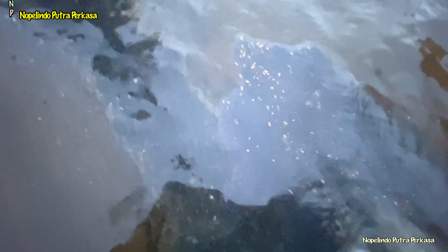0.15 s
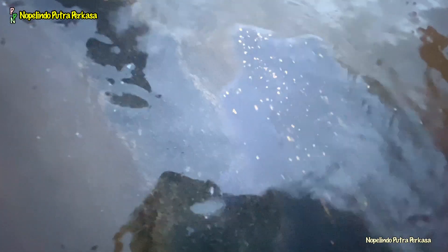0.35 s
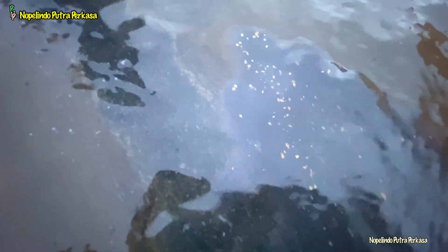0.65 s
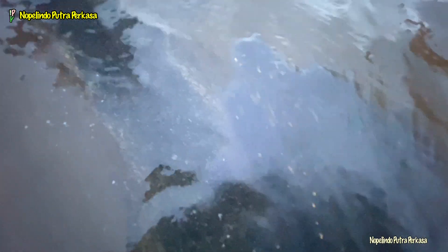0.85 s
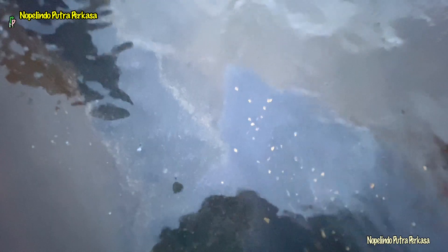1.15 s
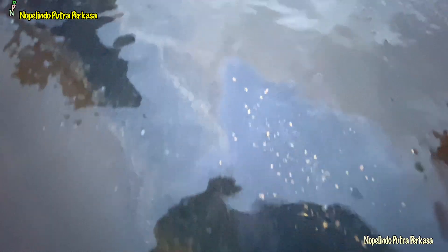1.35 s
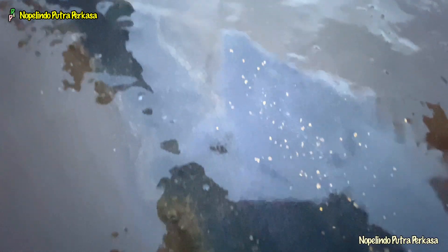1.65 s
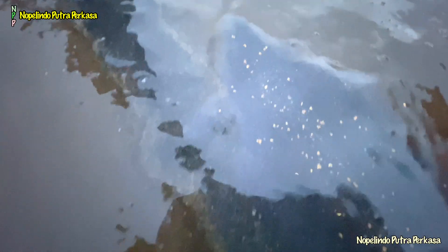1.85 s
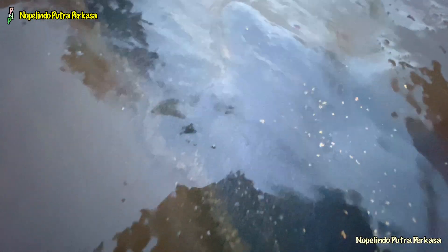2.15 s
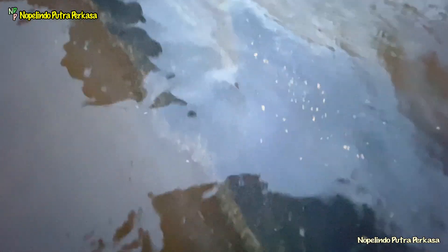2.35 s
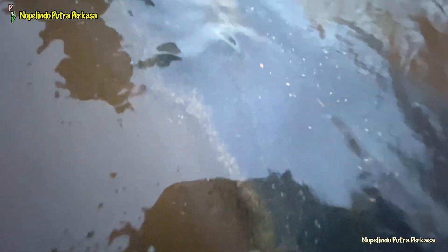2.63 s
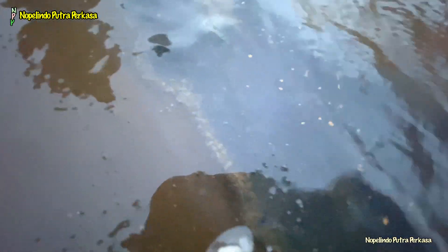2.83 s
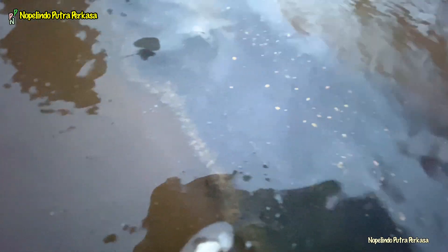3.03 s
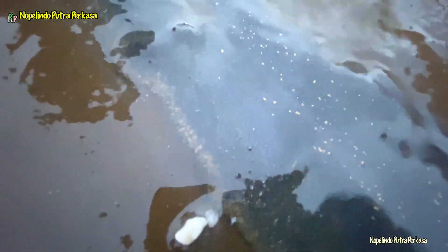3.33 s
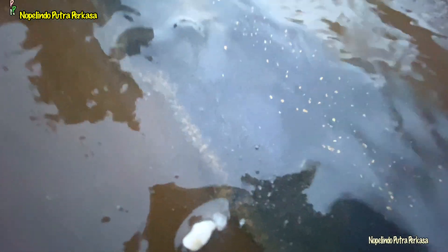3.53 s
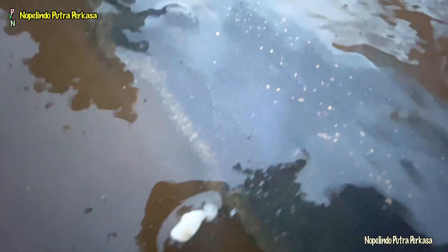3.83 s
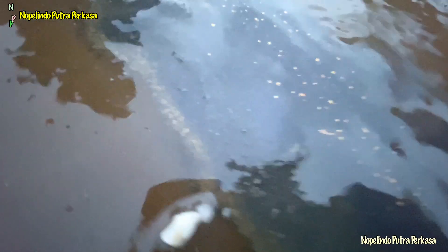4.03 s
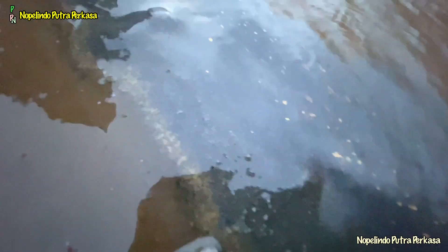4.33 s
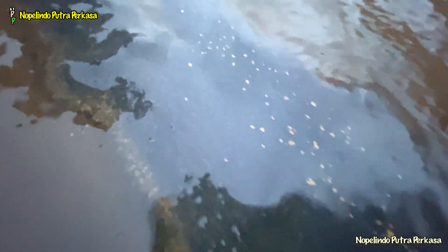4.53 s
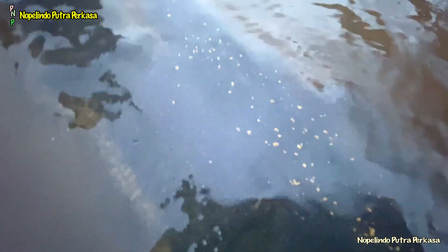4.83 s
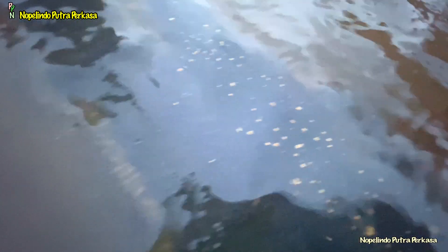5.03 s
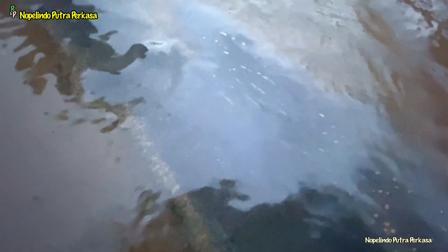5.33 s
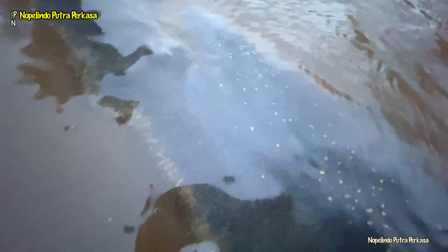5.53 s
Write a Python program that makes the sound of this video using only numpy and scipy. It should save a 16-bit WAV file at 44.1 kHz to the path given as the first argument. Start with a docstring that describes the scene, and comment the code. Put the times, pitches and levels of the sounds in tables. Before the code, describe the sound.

Very close outdoors, a wide pan of muddy water and gravel is swirled: soft gurgles, bubbly plops, gritty slaps and tiny bright drips over near silence. After about three seconds, hollow low thumps begin, growing into loud, regular knocks about five a second, each stirring up more water, ending shortly before the close. A faint rising whistle, like a distant bird, comes and goes.

```python
"""An open pit: a wide pan of muddy water and gravel is swirled close to the microphone.
Water laps and drips: crowds of ringing bubbles over hiss, gritty bursts for slaps, bright ticks for drops.
Then a run of knocks, mostly a fifth of a second apart, settles the gravel: damped pan modes make a hollow
thump, noise bands a thud and gritty noise a crack, and each knock stirs up more water.
A thin rising whistle, like a far bird, comes and goes over faint open air."""
import sys
import numpy as np
from scipy import signal
from scipy.fft import rfft, irfft, next_fast_len
from scipy.io import wavfile

SR = 44100
rng = np.random.default_rng(int(sys.argv[2]) if len(sys.argv) > 2 else 0)


def generate_wav(signal):
    """Clip the signal to [-1, 1] and save it as 16-bit WAV at the path in sys.argv[1]."""
    frames = np.transpose(np.atleast_2d(signal))
    scaled = np.clip(frames, -1, 1) * 32767
    pcm = np.round(scaled).astype(np.int16)
    wavfile.write(sys.argv[1], SR, pcm)


N = 250047
TIME = np.arange(N) / SR

# knocks on the pan: t/s, boom level/dB, ring level/dB, thud level/dB, crack level/dB, upper-mode pitch/ratio
KNOCK_TABLE = [(3.1508, -11.5, -29, -22, -40, 1.07), (3.3882, -3.5, -16, -16.5, -27.5, 0.91),
               (3.5753, -6.5, -21.5, -18.5, -33.5, 0.96), (3.7564, -6, -17, -18, -29, 0.85),
               (3.9530, 0, -7.5, -14.5, -25.5, 1.065), (4.1910, -1.5, -10.5, -13, -22.5, 1.03),
               (4.416, 1, -4.5, -8, -23.5, 1.015), (4.6540, -0.5, -12.5, -13, -22, 1.07),
               (4.9001, -3.5, -3, -10, -18.5, 0.94), (4.9648, -3, -6, -14.5, -16, 1.04),
               (5.1135, -23, -14.5, -14.5, -41, 0.95), (5.1548, 0, -7, -12.5, -15.5, 1.06),
               (5.361, -33, -38, -46, -45.5, 1.2), (5.4350, -21, -29, -23, -63, 1.02)]


def from_db(db):
    """Decibels to gain."""
    return 10 ** (np.asarray(db) / 20)


def rms_one(x):
    """Scale to rms 1."""
    return x / np.sqrt(np.mean(x ** 2) + 1e-20)


def add(track, s, sound):
    """Mix a sound into the track from time s on."""
    at = max(round(s * SR), 0)
    room = track[..., at:at + sound.shape[-1]]
    room += sound[..., :room.shape[-1]]


def coloured(x, points):
    """Filter by a spectrum of (Hz, dB) points, joined by lines over log frequency."""
    size = next_fast_len(N + 4096)
    hz, db = np.transpose(points)
    bins_hz = np.arange(size // 2 + 1) * SR / size
    gain = from_db(np.interp(np.log(bins_hz + 1), np.log(hz), db))
    return irfft(rfft(x, size) * gain, size)[..., :N]


def at_ports(x, lead):
    """Place one source at both microphone ports, the left ahead in phase by lead radians."""
    analytic = signal.hilbert(x, next_fast_len(N))[:N]
    left = np.real(analytic * np.exp(1j * lead))
    return np.array([left, x])


def drift(hz):
    """Random wandering with rms 1: noise low-passed at hz."""
    low_pass = signal.butter(2, hz, fs=SR, output="sos")
    slow = signal.sosfilt(low_pass, rng.standard_normal(N + SR // 2))
    return rms_one(slow[-N:])  # leaves out the filter's start


def open_air(level_db=-68.5):
    """Still open air: a steady, low-weighted noise, independent at the two ports."""
    # spectrum of the air: f/Hz, level/dB
    air_spectrum = [(20, -11), (80, -7.5), (200, -1), (500, -8), (1200, -21.5), (3000, -24), (7000, -28.5),
                    (12000, -50.5), (16000, -46)]
    return from_db(level_db) * rms_one(coloured(rng.standard_normal((2, N)), air_spectrum))


def whistles(start_hz=3180, end_hz=3780, blur_hz=150, flutter_db=4):
    """A faint rising note, smeared and broken by distance: slow noise modulates a gliding sine."""
    # far whistles: t/s, level/dB, length/s
    calls = [(0.474, -66.5, 0.19), (1.642, -60, 0.19), (2.427, -70, 0.25), (4.048, -63.5, 0.17)]
    out = np.zeros((2, N))
    low_pass = signal.butter(2, blur_hz, fs=SR, output="sos")
    blur = rms_one(signal.sosfilt(low_pass, rng.standard_normal((2, N))))
    for s, db, length in calls:
        part = np.linspace(0, 1, int(length * SR))
        phase = 2 * np.pi * np.cumsum(start_hz + (end_hz - start_hz) * part) / SR
        add(out, s, from_db(db) * np.sin(np.pi * part) * np.sin(phase))
    return out * blur * from_db(flutter_db * drift(hz=44.7))


def handling():
    """The pan rumbles softly in the hands: low noise that follows a level curve."""
    # hands on the rim: t/s, rumble level/dB
    grip_levels = [(0, -83), (1.2, -70), (2.3, -65), (3.0, -68), (3.6, -56), (4.1, -49.5), (4.9, -54.5),
                   (5.45, -50), (5.67, -65.5)]
    # spectrum of the rumble: f/Hz, level/dB
    rumble_spectrum = [(20, -9), (60, 9), (130, 1.5), (220, -11.5), (450, -28.5), (1000, -60.5)]
    level = from_db(np.interp(TIME, *np.transpose(grip_levels)))
    return level * rms_one(coloured(rng.standard_normal((2, N)), rumble_spectrum))


def air_pockets(rest_hz=480, width_hz=20):
    """Trickling water sounds air trapped under the rim: a noise-blurred note that rises as the pocket closes."""
    # air pockets: t/s, level/dB, length/s, rise in pitch/share
    pocket_events = [(0.15, -67.5, 0.34, 0.009), (1.52, -61, 0.24, 0.036), (1.76, -55.5, 0.08, 0.29)]
    out = np.zeros(N, complex)
    for s, db, length, rise in pocket_events:
        part = np.linspace(0, 1, int(length * SR))
        phase = 2 * np.pi * np.cumsum(rest_hz * (1 + rise * part ** 2)) / SR
        add(out, s, from_db(db) * np.sin(np.pi * part) * np.exp(1j * phase))
    # two independent drifts widen the note into a narrow band
    blurred = drift(hz=width_hz) * out.real + drift(hz=width_hz) * out.imag
    return at_ports(blurred, lead=0.47)


def drops(t60=0.027, drips_per_s=7, drip_db=-57, drip_spread_db=2.5):
    """Drops land with a tiny bright tick: decaying noise, for listed big drops and random small drips."""
    # the biggest drops off the rim: t/s, level/dB before the cut below
    big_drops = [(0.1275, -54), (0.6389, -48), (0.7511, -49), (2.2857, -52), (2.3516, -49.5),
                 (2.6803, -44.5), (2.6995, -39.5), (2.7557, -45), (2.799, -49), (2.8564, -49),
                 (2.906, -51.5), (2.9803, -45.5), (3.212, -51.5), (3.354, -49), (5.4355, -49.5)]
    level, t = np.zeros(N), TIME[:SR // 20]
    chance = rng.random((int(drips_per_s * N / SR), 2))
    drips = [(when * N / SR, drip_db + drip_spread_db * (2 * size - 1)) for when, size in chance]
    for s, db in list(big_drops) + drips:
        add(level, s - .0005, from_db(db - 7 - 60 * t / t60))
    # f/Hz, level/dB
    tick = [(500, -5.5), (2500, -10.5), (5500, -1.5), (7500, -1), (9000, 0.5), (12000, -20.0), (15500, -17)]
    return level * rms_one(coloured(rng.standard_normal((2, N)), tick))


def bubbles(splash_level, cycles=38, rise=0.15, blips_per_s=22, blip_db=8.5, blip_spread_db=5.5):
    """A bubble rings and climbs in pitch as it nears the surface; random small ones follow the splash level."""
    # the biggest single bubbles: t/s, level/dB before the lift below, starting f/Hz
    big_bubbles = [(.489, -37, 5230), (.532, -49, 980), (.718, -40, 2590), (1.152, -33.5, 570),
                   (1.200, -31, 570), (1.226, -29, 540), (1.257, -37, 600), (1.279, -38.5, 2220),
                   (1.417, -36.5, 1740), (1.431, -41, 2920), (1.588, -40, 1350), (1.698, -40.5, 1340),
                   (2.350, -41, 2750), (2.605, -40, 2580), (2.668, -40.5, 870), (2.699, -35, 872),
                   (3.028, -31.5, 2110), (3.046, -28.5, 522), (3.065, -36, 2050), (3.244, -38, 1410),
                   (3.336, -42.5, 1880), (3.473, -32.5, 1335), (4.169, -42, 1390), (4.752, -29, 4120),
                   (4.978, -20, 5670), (5.617, -42, 875)]
    low_hz, high_hz = 1100, 3180  # range of the small ones
    out, t = np.zeros(N), TIME[:SR // 8]
    when, size, pitch = rng.random((int(blips_per_s * N / SR), 3)).T
    splash_db = 20 * np.log10(splash_level[(when * N).astype(int)])
    blips_db = splash_db + blip_db + blip_spread_db * (2 * size - 1)
    blips = zip(when * N / SR, blips_db, low_hz * (high_hz / low_hz) ** pitch)
    for s, db, hz in [*big_bubbles, *blips]:
        life = t * hz / cycles  # reaches 1 when the ring is 60 dB down
        swell = 1 - np.exp(-t * hz / 1.8)
        tone = np.sin(2 * np.pi * hz * t * (1 + rise * life / 2))
        add(out, s, from_db(db + 1.0 - 60 * life) * swell * tone)
    return at_ports(out, lead=1.82)


def slaps(grain_db=3.0, width=1.35):
    """Short gritty band-passed bursts as the load meets the wall, with one more around each knock."""
    # water and gravel thrown against the wall: t/s, level/dB, length/s, centre f/Hz
    wall_hits = [(1.100, -47.5, 0.055, 1340), (1.552, -51.5, 0.021, 1920), (1.628, -46.5, 0.034, 1260),
                 (1.665, -50, 0.014, 2300), (1.742, -50.5, 0.014, 2000), (2.689, -50.5, 0.037, 3220),
                 (3.024, -45, 0.057, 750), (3.726, -50, 0.02, 6200), (4.321, -37, 0.021, 710),
                 (4.742, -41, 0.027, 3900), (5.028, -30.5, 0.0086, 1100), (5.237, -35, 0.034, 1120),
                 (5.653, -54.5, 0.04, 6860)]
    # burst at a knock: start from the knock/s, level above its ring/dB, length/s, centre f/Hz
    knock_burst = (-0.01, -26, 0.021, 820)
    out, t = np.zeros(N), TIME[:SR // 5]
    offset, burst_db, burst_length, burst_hz = knock_burst
    at_knocks = [(s + offset, ring_db + burst_db, burst_length, burst_hz) for s, _, ring_db, *_ in KNOCK_TABLE]
    for s, db, length, hz in list(wall_hits) + at_knocks:
        grit = rng.standard_normal(len(t)) * from_db(grain_db * rng.exponential(1, len(t)))
        band = signal.butter(1, [hz / width, hz * width], "band", fs=SR, output="sos")
        burst = rms_one(signal.sosfilt(band, signal.sosfilt(band, grit)))
        arch = np.sin(np.pi * np.minimum(t / length, 1))
        add(out, s, from_db(db) * burst * arch)
    return at_ports(out, lead=1.85)


def surge(s, hold, attack_s=0.049, t60=0.4):
    """A wave builds up until time s, runs for a while and drains away."""
    build = np.clip(1 + (TIME - s) / attack_s, 0, 1) ** 2
    return build * from_db(-60 * np.maximum(TIME - s - hold, 0) / t60)


def stirring(wake_delay_s=0.0016, wake_hold_s=0.12, wake_follows=1.09):
    """Levels of gurgle, splash and spray: the powers of trickle, waves and every knock's wake add up."""
    # waves that run round the pan: t/s, hold/s, gurgle level/dB, splash level/dB, spray level/dB
    waves = [(0.13, 0.24, -68, -78, -87), (0.47, 0.33, -69.5, -74, -73), (0.85, 0.3, -77, -79, -77.5),
             (1.11, 0.12, -48, -58.5, -68.5), (1.27, 0.14, -60, -63.5, -63.5),
             (1.46, 0.11, -63.5, -57, -58), (1.63, 0.12, -64.5, -60.5, -66), (2.28, 0.31, -77.5, -77, -78),
             (2.61, 0.085, -62, -71.5, -80), (3.03, 0.089, -50, -56, -72.5), (3.22, 0.1, -72, -67.5, -71.5),
             (3.42, 0.05, -49, -59, -60), (3.63, 0.17, -57, -68, -64.5), (4.33, 0.13, -44, -53, -71.5),
             (4.74, 0.018, -55.5, -51, -55), (4.85, 0.22, -53, -63, -62), (5.245, 0.014, -42.5, -55.5, -78)]
    # water stirred up by a knock whose boom is at 0 dB: gurgle level/dB, splash level/dB, spray level/dB
    full_wake = (-48, -60.5, -75)
    # trickle between the waves: gurgle level/dB, splash level/dB, spray level/dB
    trickle = (-76.5, -79.5, -80)
    wakes = []
    for s, boom_db, *_ in KNOCK_TABLE:
        wake_db = np.array(full_wake) + wake_follows * boom_db  # dB of water for each dB of the knock
        wakes.append((s + wake_delay_s, wake_hold_s, *wake_db))
    power = from_db(trickle)[:, None] ** 2
    for s, hold, *levels_db in list(waves) + wakes:
        power = power + np.outer(from_db(levels_db), surge(s, hold)) ** 2
    return np.sqrt(power)


def ring(clicks, hz, t60):
    """A two-pole resonator: a unit click sets a sine of about height 1 ringing."""
    r, w = from_db(-60 / (t60 * SR)), 2 * np.pi * hz / SR
    return signal.lfilter([0, np.sin(w)], [1, -2 * r * np.cos(w), r * r], clicks + 1e-18)


def froth(spectrum, per_s, cycles, spread_db, hiss_db, clump_db, count=22):
    """A crowd of small bubbles, each ringing for some cycles, over the diffuse hiss of running water."""
    born = np.flatnonzero(rng.random(N) < per_s / SR)
    heights = from_db(spread_db * np.minimum(rng.exponential(1, N), 3.5))
    sizes = (heights * rng.choice([-1, 1], N))[born]
    dealt = rng.integers(0, count, N)[born]  # each bubble gets one of the pitches
    crowd = 0
    for k, hz in enumerate(np.geomspace(spectrum[1][0] * 0.79, spectrum[-2][0], count)):
        clicks = np.bincount(born, sizes * (dealt == k), N)
        crowd = crowd + hz * ring(clicks, hz, cycles / hz)
    both = at_ports(rms_one(coloured(crowd, spectrum)), lead=1.596)
    hiss = from_db(hiss_db) * rms_one(coloured(rng.standard_normal((2, N)), spectrum))
    clumps = from_db(clump_db * drift(hz=35))  # water breaks in clumps
    return rms_one((both + hiss) * clumps)


def water(gurgle_level, splash_level, spray_level):
    """Big slow bubbles gurgle, smaller ones splash, the finest fizz."""
    # colours of the water, each: f/Hz, level/dB
    gurgle_spectrum = [(100, -15), (300, -7.5), (550, -5.5), (950, -6), (1400, -26), (2500, -53.5)]
    splash_spectrum = [(600, -34.5), (1200, 5), (2300, 2.5), (3200, -16.5), (4200, -11), (6000, -38.5)]
    spray_spectrum = [(1800, -13), (4000, 1), (4800, -3.5), (6300, -1), (7600, -11.5), (8800, -5.5),
                      (12000, -21), (15500, -38.5)]
    gurgle = froth(gurgle_spectrum, per_s=300, cycles=30, spread_db=3.5, hiss_db=-5, clump_db=1.5)
    splash = froth(splash_spectrum, per_s=600, cycles=48, spread_db=4.0, hiss_db=-3, clump_db=1.95)
    spray = froth(spray_spectrum, per_s=1200, cycles=90, spread_db=4.5, hiss_db=-1, clump_db=2.27)
    return gurgle_level * gurgle + splash_level * splash + spray_level * spray


def cracks(rise_s=.003, t60=0.024, tail_db=-24, tail_t60=0.15, grain_db=3.0, rough_db=2.5):
    """The gritty contact of a knock, then gravel hissing as it settles: noise with a fast and a slow decay."""
    # spectrum of the contact: f/Hz, level/dB
    crack_spectrum = [(300, 17.5), (900, 5), (2000, 0.5), (4300, -3), (6000, -5.5), (7600, -16.5),
                      (8600, -13), (12000, -28.5), (15500, -26.5)]
    level, t = np.zeros(N), TIME[:SR // 4]
    decay = from_db(-60 * t / t60) + from_db(tail_db - 60 * t / tail_t60)
    shape = (1 - np.exp(-(t / rise_s) ** 2)) * decay
    for s, _, _, _, crack_db, _ in KNOCK_TABLE:
        add(level, s - .002, from_db(crack_db + 6.5) * shape)
    grit = rng.standard_normal((2, N)) * from_db(grain_db * rng.exponential(1, N))
    return level * rms_one(coloured(grit, crack_spectrum) * from_db(rough_db * drift(hz=413)))


def thuds(travel_s=0.00078, t60=0.074, rise_cycles=0.35, count=9):
    """Water and gravel damp a thicket of other modes: noise bands, the bass late, so the thud falls in pitch."""
    # dense, quickly damped modes: f/Hz, level/dB
    thud_spectrum = [(110, 1), (230, -5), (330, -3.5), (400, 5), (500, -5.5), (700, -7), (1000, -8.5),
                     (1500, -36), (2000, -24)]
    out, t = np.zeros(N), TIME[:SR // 4]
    points_hz, points_db = np.transpose(thud_spectrum)
    edges = np.geomspace(points_hz[0], points_hz[-1], count + 1)
    for low, high in zip(edges, edges[1:]):
        hz, level = np.sqrt(low * high), np.zeros(N)
        age = np.maximum(t - travel_s * (300 / hz), 0)
        band_t60 = t60 * (600 / hz) ** .2
        shape = (1 - np.exp(-age * hz / rise_cycles)) * from_db(-60 * age / band_t60)
        band_db = np.interp(hz, points_hz, points_db) - 4.0
        for s, boom_db, ring_db, thud_db, _, _ in KNOCK_TABLE:
            # a soft contact is duller
            soft_db = .5 * min(ring_db - boom_db, 0) * np.clip(np.log2(hz / 450), 0, 1)
            add(level, s, from_db(thud_db + soft_db + band_db) * shape)
        band = signal.butter(3, [low, high], "band", fs=SR, output="sos")
        noise = (level + 1e-12) * rng.standard_normal(N)
        out += signal.sosfilt(band, noise) * np.sqrt(SR / 2 / (high - low))  # evens out the bandwidths
    return at_ports(out, lead=1.68)


def knocks(swell_cycles=0.42, travel_s=0.00089, vary_db=3.5, detune=.018, grip_db_per_s=30):
    """Each knock rings the pan; bending waves are slower at low pitch, so the boom swells after the ring."""
    # modes of the water-loaded pan: f/Hz, level/dB, t60/s, left over right/dB, left phase lead/rad
    pan_modes = [(69.9, 2.5, 0.077, -10, 1.5), (94.1, -1.5, 0.098, -21.5, 0.9), (111.7, -11.5, 0.11, 6, 3),
                 (150, -10.5, 0.13, -26.5, 3.5), (179.6, -1.5, 0.19, -14, -1),
                 (211.7, -2.5, 0.083, -11.5, 5.5), (244.3, -14.5, 0.13, 6, 2), (316, -18.5, 0.053, 1.5, -5),
                 (417.5, -11.5, 0.088, -3, 1.63), (570, -13.5, 0.074, 3.5, -0.25),
                 (666, -24, 0.018, -12, 1.5), (736, -21, .06, -0.5, -1.5), (760, -23, .06, -5, 3),
                 (922, -13, 0.093, -0.5, 1.0), (1166, -26.5, 0.073, 4, 0.15), (1302, -40, 0.2, 8.5, 2),
                 (1580, -41, 0.1, 1.5, -4), (1824, -33, 0.078, -1.5, -2)]
    out, t = np.zeros((2, N)), TIME[:SR // 3]
    rest_hz, mode_db, t60, balance_db, lead = np.transpose(pan_modes)[:, :, None]
    age = np.maximum(t - travel_s * np.sqrt(183 / rest_hz), 0)
    side = (-1) ** np.arange(len(rest_hz))[:, None]  # neighbouring modes swing in opposite directions
    swell = (1 - np.exp(-age * rest_hz / swell_cycles)) ** 2
    shape = side * swell * from_db(mode_db - 60 * age / t60)
    upper = np.interp(np.log(rest_hz), np.log([390, 680]), [0, 1])  # 0 for boom modes, 1 for ring modes
    chance = rng.standard_normal((len(KNOCK_TABLE), 3, len(rest_hz), 1))
    for (s, boom_db, ring_db, _, _, pitch), luck in zip(KNOCK_TABLE, chance):
        # the shifting water retunes the upper modes
        hz = rest_hz * (1 + upper * (pitch - 1 + detune * luck[0]))
        strength_db = boom_db + upper * (ring_db - boom_db)
        swing = shape * from_db(strength_db + vary_db * luck[1] * (1 + upper) / 2)
        # the hands damp every knock differently
        swing = swing * from_db(-grip_db_per_s * age * np.abs(luck[2]))
        phase = 2 * np.pi * hz * age
        left = swing * from_db(balance_db) * np.sin(phase + lead)
        right = swing * np.sin(phase)
        add(out, s, np.array([left, right]).sum(axis=1))
    return out


def scene():
    """Pan and water in still, open air."""
    gurgle, splash, spray = stirring()
    surroundings = open_air() + whistles()
    wet = air_pockets() + drops() + bubbles(splash) + slaps() + water(gurgle, splash, spray)
    pan = handling() + cracks() + thuds() + knocks()
    return surroundings + wet + pan


def record(dry):
    """The microphone's right port is brighter in the top octave; loud peaks are rounded and the top is cut."""
    brightness = [(7800, 0), (8050, 11), (11500, 9), (14500, 2)]  # f/Hz, level/dB
    both = np.array([dry[0], coloured(dry[1], brightness)])
    rounded = both / (1 + both ** 6) ** (1 / 6)
    top_cut = signal.cheby2(14, 70, 16800, fs=SR, output="sos")  # 70 dB down from 16800 Hz
    return signal.sosfilt(top_cut, rounded)


dry = scene()
out = record(dry)
generate_wav(out)
```